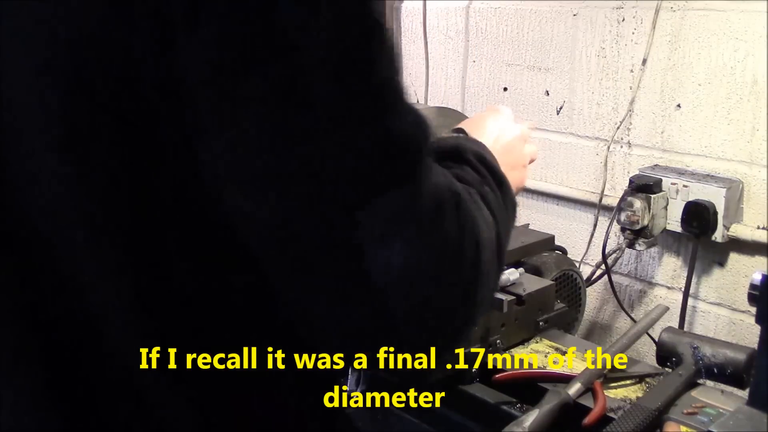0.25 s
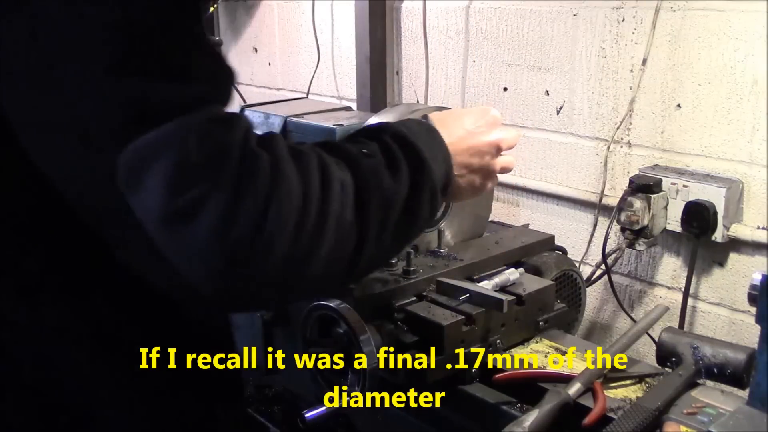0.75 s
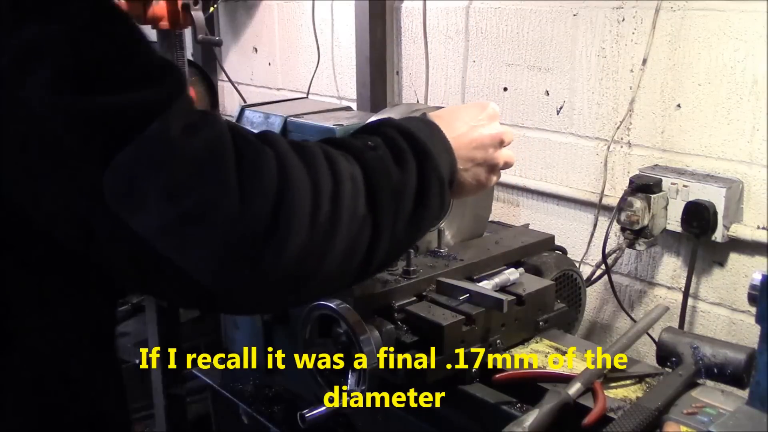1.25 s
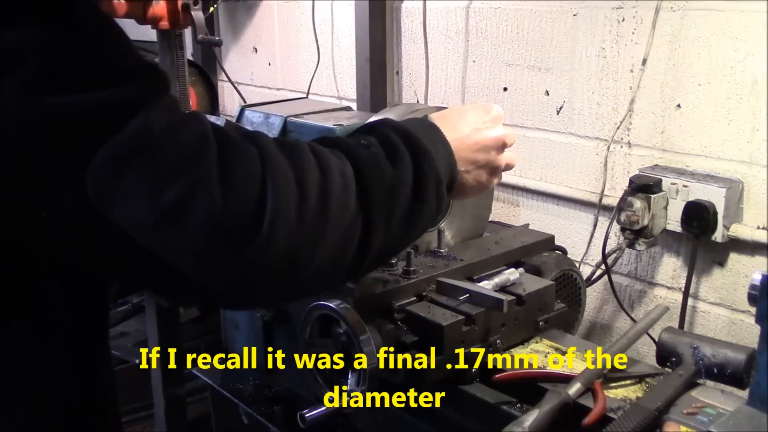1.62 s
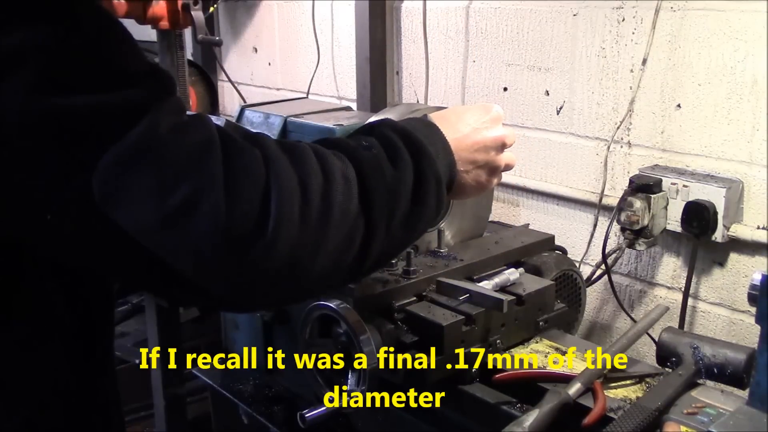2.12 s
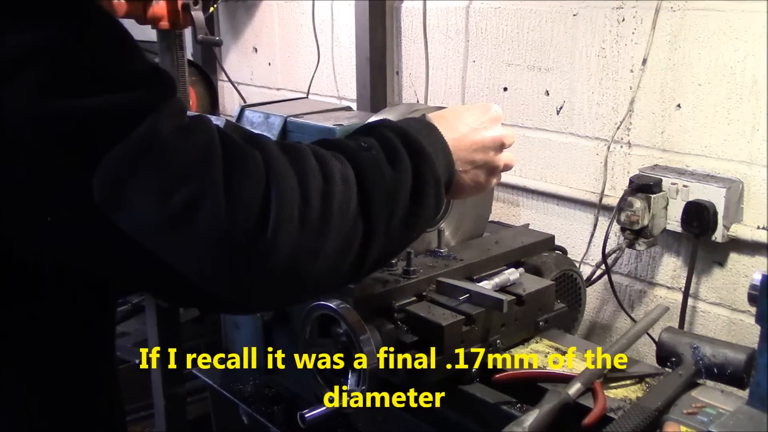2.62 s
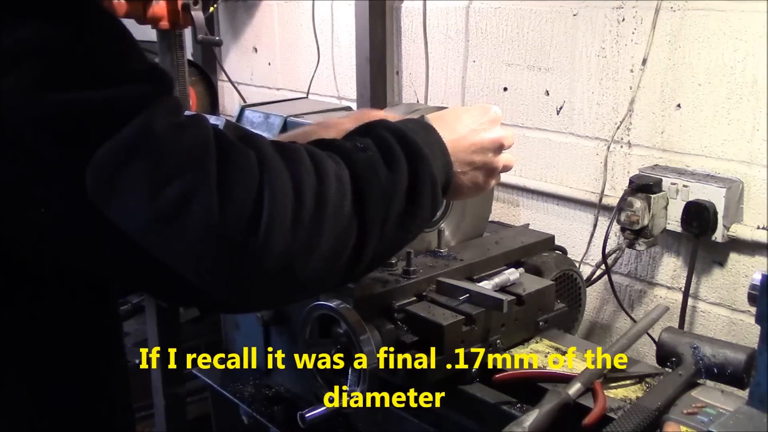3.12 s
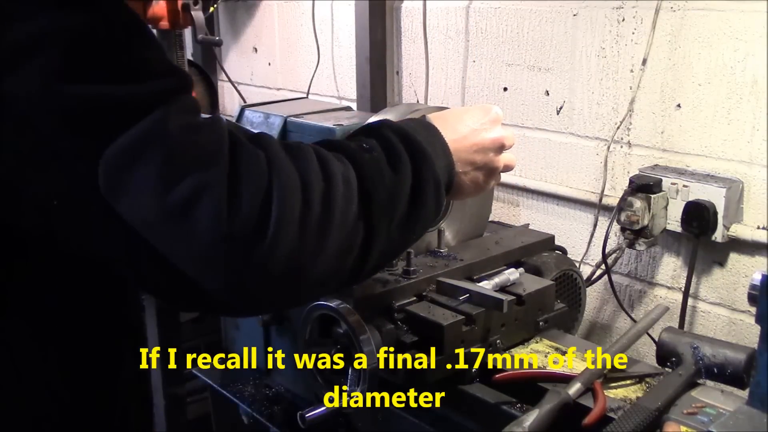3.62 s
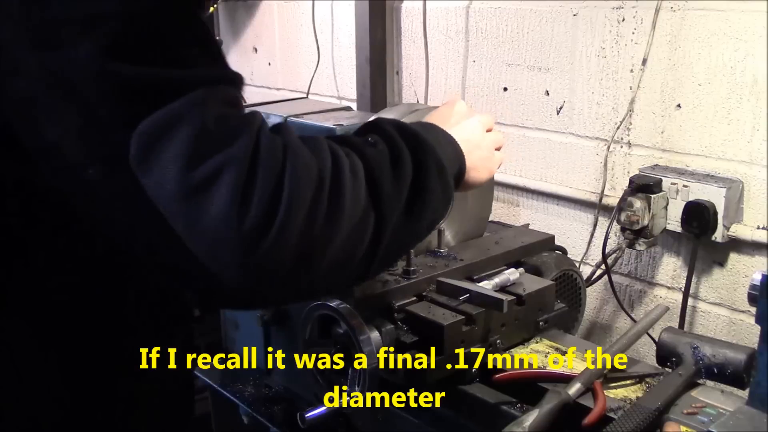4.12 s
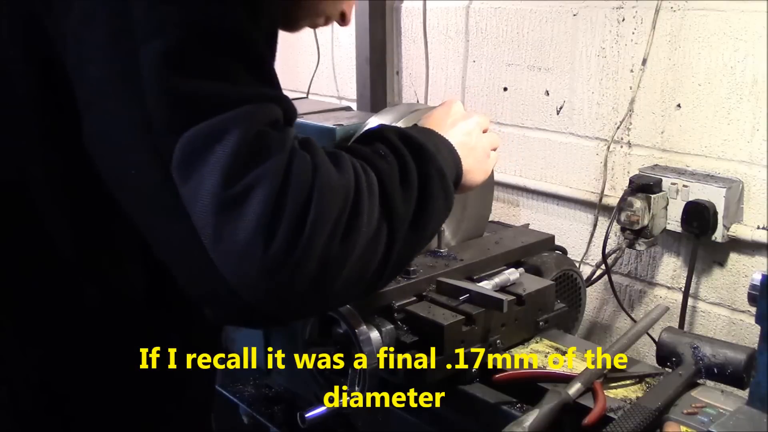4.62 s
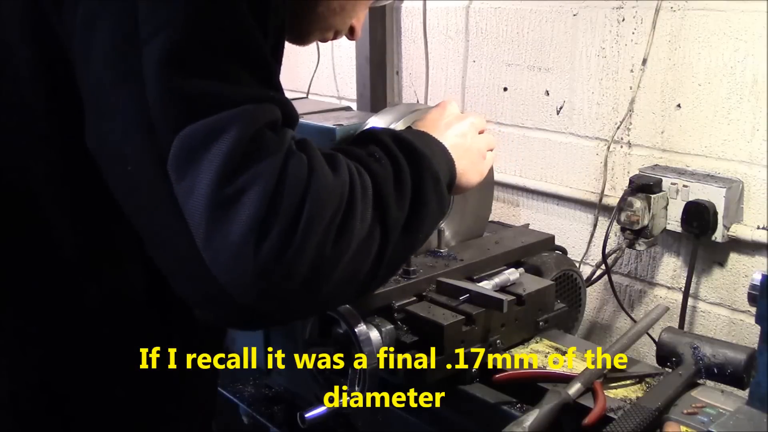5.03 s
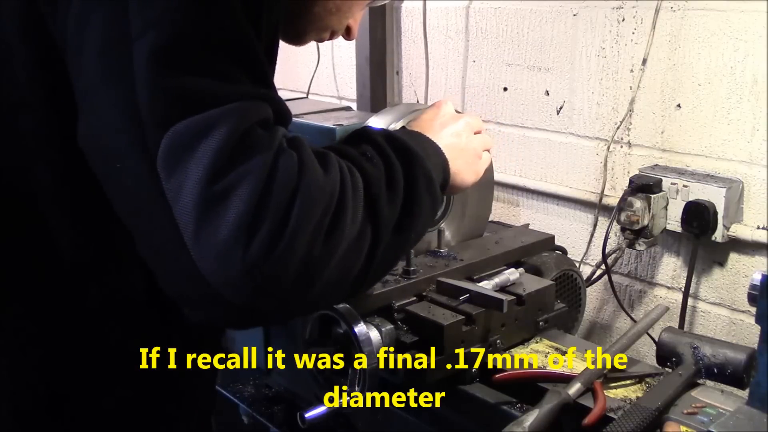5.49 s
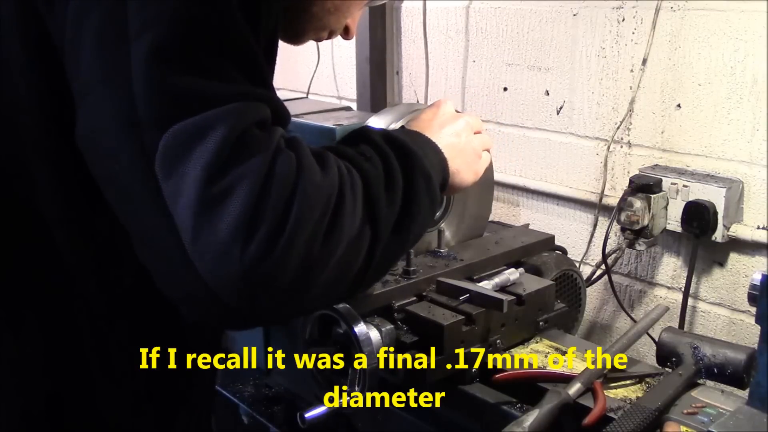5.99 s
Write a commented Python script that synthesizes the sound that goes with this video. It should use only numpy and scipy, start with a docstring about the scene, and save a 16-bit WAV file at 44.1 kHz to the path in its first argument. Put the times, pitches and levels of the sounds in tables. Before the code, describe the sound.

Close to a small lathe, a low-level fan drone and small handling clicks come first, with a short burst of grainy cloth strokes. The motor then kicks in abruptly, shaking the frame and jingling a loose part, and runs at a steady speed with a piercing hum and dry rattle. A soft hollow wheel knock precedes over a second of high, shimmering metal friction, which stops just before the end. The stereo is narrow.

```python
"""Starting a lathe in a small workshop

A fan hums, clothes rustle and a sleeve brushes the lathe, then its motor is switched on.
Surging noise shakes the frame, rotor slots sing as sine tones, and a bearing rattles through resonances.
Small ticks, clinks and two handwheel pushes are short shaped sounds. Near the end a tool rubs the
turning metal: narrow bands of noise ring brightly over a gritty hiss."""
import sys
import numpy as np
from scipy import signal
from scipy.fft import rfft, irfft, next_fast_len
from scipy.io import wavfile
from scipy.ndimage import uniform_filter1d

SR = 44100
rng = np.random.default_rng(int(sys.argv[2]) if len(sys.argv) > 2 else 0)


def generate_wav(sig):
    """Save sig (samples, or channels by samples) to the path in sys.argv[1] as 16-bit PCM at SR."""
    pcm = np.round(np.clip(np.atleast_2d(sig).T, -1, 1) * 32767).astype(np.int16)
    wavfile.write(sys.argv[1], SR, pcm)


N = 275705
T = np.arange(N) / SR  # time in seconds
LEFT_RIGHT = np.array([[1], [-1]])  # plus for the left channel, minus for the right

# Steady fan tones. Each row: pitch in Hz, level in dB.
FAN_TONES = [(100.1, -60), (338.1, -38), (418.4, -55.5), (477.4, -50), (537, -54.5), (636.3, -55)]
# Level of the tone one octave above the blade tone. Each row: time in seconds, level in dB.
BLADE_OCTAVE = [(0, -40), (.3, -49), (.9, -45), (1.2, -37), (1.6, -39), (2.3, -43)]
# Colour of the room noise. Each row: frequency in Hz, relative level in dB per Hz.
ROOM_COLOUR = [(18, -101), (30, -67.5), (152, -16), (263, -11), (332, -7.5), (389, -10.5), (479, -9.5),
               (591, -12), (728, -9.5), (1640, -20), (4780, -26.5), (12600, -68), (15500, -73)]
# How much the two channels differ. Each row: frequency in Hz, side signal against the middle in dB.
SIDE_SHARE = [(30, -19.5), (70, -30.5), (300, -41), (1000, -21), (3000, -15.5), (7000, -19), (12000, -21.5)]
# Treble of the faint rustle of clothes. Each row: time in seconds, level in dB.
RUSTLE = [(0, -64), (.35, -59.5), (.65, -55), (.85, -64), (1.27, -54), (1.86, -70), (2.3, -69)]
# Switch snap and small ticks of hands on the machine.
# Each row: start in seconds, level in dB, centre in Hz, time to fade by 60 dB in seconds.
TICKS = [(0.019, -28, 680, 0.059), (0.234, -32.5, 1500, 0.066), (0.402, -38, 2960, 0.12),
         (0.78, -42, 4000, .03), (.808, -20.5, 2000, 0.063), (.912, -26, 1800, .03),
         (0.991, -26, 1880, 0.018), (1.292, -43, 5000, 0.025), (1.44, -52, 9000, 0.044),
         (1.492, -42, 6500, 0.026), (1.577, -43, 7000, 0.024), (1.657, -51, 8000, .06),
         (2.37, -21.5, 7100, 0.084), (2.373, -38, 7000, 0.95), (2.465, -35.5, 8500, 0.25),
         (2.575, -38, 6000, 0.13), (2.657, -31, 5000, .04), (3.82, -39, 7000, 0.095)]
# Strokes of cloth on the machine.
# Each row: time of the peak in seconds, level in dB, pitch of the hollow tone in Hz, crackle level in dB.
STROKES = [(.812, -21, 1793, -33), (0.913, -22.5, 1350, -36), (1.0, -31, 1316, -60)]
# Colour of the cloth noise. Each row: frequency in Hz, relative level in dB per Hz.
CLOTH_COLOUR = [(88, -47), (150, -13), (332, -1), (366, -25), (618, -14), (894, -9.5), (1800, -7.5),
                (2700, -16), (4310, -18), (15500, -56)]
# Motor speed. Each row: time in seconds, speed in turns per second.
MOTOR_SPEED = [(2.36, 5), (2.44, 17), (2.48, 24.4), (2.52, 24.85), (2.6, 24.935), (4.6, 24.935),
               (4.9, 24.905), (6.25, 24.905)]
# Loudness of the running motor. Each row: time in seconds, level in dB.
MOTOR_LEVEL = [(2.366, -50), (2.372, -0.5), (2.45, -35), (2.49, -6.5), (2.56, -2), (6.25, -2.5)]
# Level that the loud slot tones follow. Each row: time in seconds, level in dB.
SONG_LEVEL = [(2.47, -39), (2.49, -10), (2.54, -22), (2.56, -13), (3.92, -14), (4.08, -11.5), (4.45, -12),
              (5.06, -13.5), (6.25, -14)]
# Loud slot tones. Each row: multiple of the magnetic pull, dB against the song level, the same once the
# worker leans in, left minus right in dB, the same once leaning in, lead of the left channel in radians.
SONG_TONES = [(1, 0, 0.5, 0.5, .4, -0.22), (2, -10, -14, -3, 0, .11), (0, -14.5, -17, -1.5, -.8, .03)]
# Weaker magnetic tones. Each row: multiple of the slot rate, multiple of the magnetic pull, level in dB.
WEAK_TONES = [(0, 1, -45), (0, 2, -33), (0, 3, -36.5), (0, 4, -38), (0, 5, -35), (0, 6, -31.5), (0, 7, -41),
              (0, 16, -44), (1, -3, -32.5), (1, -1, -40.5), (1, 3, -28), (1, 4, -39), (1, 5, -49),
              (2, 0, -41), (2, 1, -42), (2, 2, -42.5), (2, 4, -57.5), (3, -2, -72), (3, 0, -37.5),
              (3, 1, -41.5), (3, 2, -57)]
# Resonances of the bearing housing. Each row: centre in Hz, width in Hz, relative level in dB,
# share of the knocks that swings with the load from 0 to 1.
HOUSING = [(1990, 290, -20.5, 0.1), (2303, 41, -1.5, 0), (2595, 250, -6, 0.71), (2660, 54, 0, 0.46),
           (2762, 76, -2, 0.16), (2956, 47, 3, 0.74), (3450, 290, -8.5, 0.96), (3469, 147, 3, 0.92),
           (3425, 70, -2.5, 1), (3787, 36, -5, .8)]
# Frame modes shaken by the running motor. Each row: centre in Hz, width in Hz, level in dB.
FRAME_MODES = [(93.6, 5.4, -46.5), (296, 32, -36), (559, 45, -34.5), (803, 42, -33.5), (935, 39, -28.5),
               (1110, 370, -34), (8060, 330, -56), (10200, 150, -73), (7800, 60, -57.5)]
# Colour of the roar of fan, belt and gears. Each row: frequency in Hz, relative level in dB per Hz.
ROAR_COLOUR = [(30, -65), (60, -40), (146, -39.5), (200, -11.5), (320, -28), (550, -12.5), (780, -30.5),
               (1000, -20), (1500, -24.5), (3400, -10), (4300, -51), (8800, -33), (10500, -44),
               (15500, -66)]
# Surges of torque at the start; the rows at 1250 and 2180 Hz are brief swells of the motor's rising whine
# passing through resonances. # Each row: time of the middle in seconds, pitch in Hz, level in dB.
SURGES = [(2.374, 545, -19), (2.386, 522, -19), (2.395, 680, -34), (2.409, 220, -29), (2.41, 530, -13),
          (2.438, 557, -10.5), (2.45, 330, -22), (2.457, 1250, -19.5), (2.468, 552, -3.5),
          (2.484, 2180, -23), (2.488, 527, -12.5), (2.497, 860, -17), (2.511, 511, -9), (2.534, 826, -10),
          (2.546, 220, -25.5), (2.55, 90, -30), (2.568, 545, -12.5), (2.61, 536, -19)]
# Clinks of a loose small part. Each row: start in seconds, level in dB.
CLINKS = [(2.4894, -48), (2.5301, -43), (2.569, -38), (2.6594, -34), (2.6928, -37), (2.9203, -42),
          (2.9542, -41)]
# Ringing of that part. Each row: pitch in Hz, relative level in dB, time to fade by 60 dB in seconds.
CLINK_MODES = [(9600, -2, .06), (10220, -2, .07), (11780, -4, .07), (12930, -10, .05), (14190, -7, .09)]
# Pushes on a handwheel. Each row: time in seconds, level of the scrape in dB.
PUSHES = [(3.82, -50.5), (4.19, -41.5)]
# Faint whistles while the wheel turns.
# Each row: time of the middle in seconds, pitch in Hz, level in dB, length in seconds.
WHISTLES = [(4.13, 7490, -49, .5), (4.17, 5590, -48, .6), (4.19, 6530, -49, .3), (4.2, 11600, -61, 1.5),
            (4.3, 8830, -51, .55), (4.35, 7950, -52, .45)]
# Ringing modes of the workpiece. Each row: centre in Hz, width in Hz, relative level in dB.
WORKPIECE = [(4620, 67, -15.5), (5900, 320, -13), (6280, 72, -6), (6870, 39, -7), (7100, 140, -13.5),
             (7830, 100, -18), (8200, 130, -18), (8120, 135, -4), (10070, 110, -8.5), (10340, 70, -17.5),
             (10300, 90, -16), (11200, 370, -21), (11500, 110, -11), (11960, 100, -12.5), (12340, 70, -8.5),
             (12750, 100, -17), (12950, 100, -27), (13400, 110, -19), (13900, 200, -15), (14300, 120, -20),
             (14930, 80, -17), (15500, 300, -22)]
# Workpiece modes that each swell towards a strongest moment.
# Each row: centre in Hz, width in Hz, level in dB at that moment,
# time of that moment in seconds, loss in dB per second away from it.
SWELLING_MODES = [(4210, 62, -36.5, 5.55, 7), (5460, 90, -42, 6.1, 3.5), (1530, 70, -35.5, 7.1, 1)]
# Colour of the rubbing hiss. Each row: frequency in Hz, relative level in dB per Hz.
RUB_COLOUR = [(710, -33), (1200, -3), (1390, -35), (1500, -17), (1900, -5.5), (2590, 3.5), (4930, -16.5),
              (8080, -9.5), (15500, -33)]

BLADE_HZ, BLADE_DB, ROOM_DB = 159.15, -51.5, -39.5
SOFT_DB, SOFT_FOLLOWS = -40, 0.21  # middle of the rustle at a treble of -57.5 dB, and dB per dB of treble
SNAP_CYCLES = 2.  # a tick's hard first instant shrinks to about a third in this many cycles
BRUSH_RISE_DB_S, BRUSH_FALL_DB_S = 337, 196
# The crackle reaches full level before the stroke peaks and holds until just after.
CRACKLE_EARLY_S, CRACKLE_LATE_S, CRACKLE_RISE_DB_S, CRACKLE_FALL_DB_S = .032, .012, 1500, 330
MAINS_HZ = 100.12  # magnetic pull, twice the supply frequency
SLOTS, BALLS, SPINDLE = 34, 5.354, .2125  # slots passed, balls passed and spindle turns per motor turn
LEAN_S, LEAN_TAKES_S = 4.05, .2  # middle and length of the worker's lean in over the machine
SWITCH_S = 2.368  # nothing of the starting shake is heard before this
SURGE_S, SURGE_LAW = .036, .8  # length at 540 Hz; lower modes swell longer by this power of pitch
SHUDDER_DB, SHUDDER_FROM_S, SHUDDER_TO_S = -20.5, 2.46, 2.63
SHUDDER_RISE_DB_S, SHUDDER_FALL_DB_S = 90, 60.5
WHEEL_RISE_DB_S, WHEEL_FALL_DB_S = 108.5, 110
KNOCK_HZ, KNOCK_DB, KNOCK_S = 1415, 15.5, 0.079  # the level is dB above the scrape
RUB_DB, RUB_FROM_S, RUB_TO_S, RUB_RISE_DB_S, RUB_FALL_DB_S = -31, 4.87, 6.125, 177, 265
SWELLING_WAVER_DB = 2.


def undb(db):
    """Turns a level in dB into a plain multiplier."""
    return 10 ** (np.asarray(db) / 20)


def unit(x):
    """Scales a sound to rms 1, a standard average strength."""
    return x / np.sqrt(np.mean(x ** 2))


def curves(table):
    """Joins each column of a table by straight lines over time."""
    s, *columns = np.transpose(table)
    return [np.interp(T, s, column) for column in columns]


def gate(table):
    """Gain from the first column, silent outside the table's time."""
    inside = (T > table[0][0]) * (T <= table[-1][0])
    return undb(curves(table)[0]) * inside


def at_hz(points, hz):
    """Reads a (Hz, value) table on a log-frequency axis."""
    points_hz, values = np.array(points)[:, 0], np.array(points)[:, 1]
    return np.interp(np.log(hz), np.log(points_hz), values)


def band(x, hz, width_hz):
    """Two-pole resonance that leaves its centre pitch at full strength."""
    b, a = signal.iirpeak(min(hz, .45 * SR), hz / width_hz, fs=SR)
    return signal.lfilter(b, a, x)


def walk(rate):
    """Random wandering: values held for 1 / rate seconds, then smoothed twice; spread near 1."""
    k = int(SR / rate)
    steps = np.repeat(rng.standard_normal(N // k + 1), k)
    return 1.32 * uniform_filter1d(uniform_filter1d(steps, k), k)[:N]


def wide(hz, width_hz, count=N):
    """Narrow band of noise, nearly alike in both channels, at rms 1."""
    mid, side = band(rng.standard_normal((2, count)), hz, width_hz)
    return unit(mid + undb(at_hz(SIDE_SHARE, hz)) * side * LEFT_RIGHT)


def hiss(colour, flicker_db):
    """Coloured noise at rms 1, in overlapping octave-spaced bands that swell together and flicker alone."""
    size = next_fast_len(N)
    hz = np.arange(size // 2 + 1) * SR / size + 1
    mid, side = rfft(rng.standard_normal((2, size))) * undb(at_hz(colour, hz))
    both = mid + undb(at_hz(SIDE_SHARE, hz)) * side * LEFT_RIGHT
    out, shared_swell = 0, walk(2.68)
    for octave in np.arange(4, 15.):
        share = np.cos(np.pi / 2 * np.clip(np.log2(hz) - octave, -1, 1)) ** 2
        flicker = undb(flicker_db * (shared_swell + walk(6.8)))
        out = out + irfft(both * share, size)[:, :N] * flicker
    return unit(out)


def tone(turns, db, waver_db, pan_db=0, lead=0):
    """A sine that follows a running count of cycles, with a wavering level."""
    phase = 2 * np.pi * turns + lead / 2 * LEFT_RIGHT
    level_db = db + waver_db * walk(6) + pan_db / 2 * LEFT_RIGHT
    return np.sqrt(2) * undb(level_db) * np.sin(phase)


def swell(s, length):
    """A smooth rise and fall around time s."""
    return np.cos(np.pi * np.clip((T - s) / length, -.5, .5)) ** 2


def dull(x, hz):
    """Cast iron passes little above hz."""
    return signal.sosfilt(signal.butter(3, hz, fs=SR, output="sos"), x)


def slope(db, from_s, to_s, rise_db_s, fall_db_s):
    """Gain that climbs to db, holds from from_s to to_s and falls, in dB per second."""
    early, late = np.maximum(from_s - T, 0), np.maximum(T - to_s, 0)
    return undb(db - rise_db_s * early - fall_db_s * late)


def add(out, sound, s):
    """Mixes a short sound in from time s."""
    first = int(s * SR)
    part = out[:, first:first + sound.shape[1]]
    part += sound[:, :part.shape[1]]


def fan():
    """A turning fan hums in steady tones, with a blade tone and its octave."""
    tones = sum(tone(hz * T + rng.random(), db, .7, lead=0.085) for hz, db in FAN_TONES)
    blade = tone(BLADE_HZ * T, BLADE_DB, 1.5, lead=.06)
    octave = tone(2 * BLADE_HZ * T, curves(BLADE_OCTAVE)[0], .7, lead=.06)
    return tones + blade + octave


def room():
    """Soft coloured noise of the room over a low rumble."""
    return undb(ROOM_DB) * hiss(ROOM_COLOUR, 0.35) + undb(-76.5) * wide(55, 60)


def rustle():
    """Clothes make uneven noise: a crisp top, and a softer middle that partly follows it."""
    treble_db = curves(RUSTLE)[0]
    crisp = undb(treble_db + 3.5 * walk(31.5)) * unit(band(wide(6000, 6000), 6000, 7000))
    soft_db = SOFT_DB + SOFT_FOLLOWS * (treble_db + 57.5) + 1.0 * walk(29)
    soft = undb(soft_db) * unit(band(wide(1300, 1800), 1300, 1800))
    return crisp + soft


def ticks():
    """Each tick is a hard snap and a dying burst of noise around one pitch."""
    out, t = np.zeros((2, N)), T[:SR]
    for s, db, hz, t60 in TICKS:
        snap = undb(2.5) * np.exp(-t * hz / SNAP_CYCLES) * np.cos(2 * np.pi * hz * t)
        noise = unit(band(wide(hz, 0.91 * hz, count=SR), hz, 2.3 * hz))
        fade = np.minimum(t / 0.0026, 1) * 1000 ** (-t / t60)
        add(out, undb(db) * (snap + fade * noise), s)
    return out


def brush():
    """Cloth drags in grainy strokes, with a hollow resonance that sinks and a crackling top."""
    hollow_turns = np.cumsum(curves(STROKES)[1]) / SR
    hollow = np.sqrt(2) * unit(walk(900)) * np.sin(2 * np.pi * hollow_turns)
    strokes = sum(slope(db, s, s, BRUSH_RISE_DB_S, BRUSH_FALL_DB_S) for s, db, _, _ in STROKES)
    grain = undb(1.7 * walk(600))
    body = strokes * grain * (0.62 * hiss(CLOTH_COLOUR, 0.98) + .5 * hollow)
    tops = sum(slope(db, s - CRACKLE_EARLY_S, s + CRACKLE_LATE_S, CRACKLE_RISE_DB_S, CRACKLE_FALL_DB_S)
               for s, _, _, db in STROKES)
    crackle = tops * undb(-8.5 + 2.5 * walk(900)) * unit(band(wide(6400, 7300), 6400, 8300))
    return body + crackle


def magnetics(turn):
    """Slot and mains tones share one field; an off-centre rotor and the spindle's load wobble them."""
    shaft, spindle = 2 * np.pi * turn, 2 * np.pi * SPINDLE * turn
    slots = SLOTS * turn + 0.02 * np.sin(spindle) + 0.0077 * walk(34)
    throb = 1 + 0.098 * np.cos(shaft) + 0.038 * np.cos(spindle + .3)
    lean = np.clip((T - LEAN_S) / LEAN_TAKES_S + .5, 0, 1)  # 0 standing back, 1 leaning in
    song_db, loud, weak = curves(SONG_LEVEL)[0], 0, 0
    for pulls, db, near_db, pan_db, near_pan_db, lead in SONG_TONES:
        level_db = song_db + db + lean * (near_db - db)
        pan = pan_db + lean * (near_pan_db - pan_db)
        loud = loud + tone(slots + pulls * MAINS_HZ * T, level_db, 0.81, pan, lead)
    for slot_count, pulls, db in WEAK_TONES:
        turns = slot_count * slots + pulls * MAINS_HZ * T
        weak = weak + tone(turns, db, 1.2, lead=.05 * rng.standard_normal())
    return throb * loud * (T > SONG_LEVEL[0][0]) + weak * gate(MOTOR_LEVEL)


def bearing(turn, knock_db=-30.5, grit_db=-35):
    """Each ball knocks on a flaw that passes through the load once a turn; grit rings the same housing."""
    # One click whenever the running count of balls reaches a new whole number.
    knocks = np.diff(np.floor(BALLS * turn), prepend=0) * undb(1.2 * walk(150))
    load = np.cos(2 * np.pi * turn)
    ring, grit = 0, 0
    for k, (hz, width, db, swing) in enumerate(HOUSING):
        loaded = knocks * (1 - swing + 0.77 * swing * load)
        ring = ring + (-1) ** k * undb(db) * band(loaded, hz, width)  # neighbours have opposite signs
        grit = grit + undb(db) * np.sqrt(width) * wide(hz, width)
    rattle = undb(knock_db) * unit(ring) + undb(grit_db) * unit(grit) * (1 + 0.073 * load)
    return dull(rattle, 4960)


def motor():
    """The running machine sings and rattles, shakes its frame modes and roars like air."""
    turn = np.cumsum(curves(MOTOR_SPEED)[0]) / SR
    frame = sum(undb(db) * wide(hz, width) for hz, width, db in FRAME_MODES)
    roar = undb(-29.5) * hiss(ROAR_COLOUR, 0.44)
    return magnetics(turn) + gate(MOTOR_LEVEL) * (bearing(turn) + frame + roar)


def start():
    """Surges of torque swell and fade roughly in single frame modes over a broad shudder; two higher swells are
    the rising whine passing through resonances."""
    out, t = np.zeros((2, N)), T[:SR // 2]
    for s, hz, db in SURGES:
        sine = np.sqrt(2) * np.sin(2 * np.pi * (hz * t + rng.random()))
        shake = sine + .3 * wide(.95 * hz, .3 * hz, count=len(t))
        length = SURGE_S * (540 / hz) ** SURGE_LAW
        rise_and_fall = np.sin(np.pi * np.minimum(t / length, 1)) ** 2
        add(out, undb(db) * rise_and_fall * shake, s - length / 2)
    shudder = slope(SHUDDER_DB, SHUDDER_FROM_S, SHUDDER_TO_S, SHUDDER_RISE_DB_S, SHUDDER_FALL_DB_S)
    rumble = wide(520, 150) + .5 * wide(370, 220) + 0.089 * wide(690, 500) + 0.034 * wide(60, 60)
    out += shudder * unit(rumble)
    return dull(out * (T > SWITCH_S), 2330)


def clinks():
    """A loose small steel part rings in several fading modes, a little to the right."""
    out, t = np.zeros((2, N)), T[:SR]
    for s, db in CLINKS:
        for hz, mode_db, t60 in CLINK_MODES:
            sine = .6 * np.sin(2 * np.pi * hz * t - .15 * LEFT_RIGHT)  # the left channel lags
            rattle = sine + .5 * unit(band(wide(hz, 300, count=SR), hz, 300))
            size = undb(db + mode_db + 2.5 * rng.standard_normal())
            add(out, size * 1000 ** (-t / t60) * rattle, s)
    return out


def handwheel():
    """Each push is a noisy scrape around a hollow knock, with a few narrow whistles."""
    scrape = sum(slope(db, s, s, WHEEL_RISE_DB_S, WHEEL_FALL_DB_S) for s, db in PUSHES)
    rasp = unit(band(wide(5300, 6000), 5900, 8000))
    knock = sum(undb(db + KNOCK_DB) * swell(s, KNOCK_S) for s, db in PUSHES)
    hollow = wide(KNOCK_HZ, 90) + 0.68 * wide(1500, 500)
    whistles = sum(undb(db) * swell(s, length) * wide(hz, 50) for s, hz, db, length in WHISTLES)
    return scrape * rasp + knock * hollow + whistles


def rubbing():
    """Friction of the tool rings the workpiece modes, each flickering alone, over a gritty hiss."""
    ring, swelling = 0, 0
    for hz, width, db in WORKPIECE:
        ring = ring + undb(db + 1.1 * walk(11)) * np.sqrt(width) * wide(hz, width)
    for hz, width, db, s, away_db in SWELLING_MODES:
        level_db = db - away_db * np.abs(T - s) + SWELLING_WAVER_DB * walk(12)
        swelling = swelling + undb(level_db) * unit(band(wide(hz, width), hz, width))
    grit = hiss(RUB_COLOUR, 1.0) * undb(2.4 * walk(370))
    contact = slope(0, RUB_FROM_S, RUB_TO_S, RUB_RISE_DB_S, RUB_FALL_DB_S)
    uneven_db = .6 * walk(20)
    bright = undb(RUB_DB + uneven_db) * (undb(-1.5) * unit(ring) + grit)
    return contact * (bright + swelling)


def scene():
    """All the sounds of the workshop added together."""
    background = fan() + room()
    hands = rustle() + ticks() + brush()
    machine = motor() + start() + clinks()
    return background + hands + machine + handwheel() + rubbing()


def record(dry):
    """The recorder rounds the loudest peaks, loses the deepest bass and cuts the top."""
    rounded = np.tanh(0.89 * dry) / 0.89
    thin = signal.sosfilt(signal.butter(2, 45, "high", fs=SR, output="sos"), rounded)
    return signal.sosfilt(signal.ellip(16, .2, 80, 15680, fs=SR, output="sos"), thin)


dry = scene()
out = record(dry)
generate_wav(out)
```